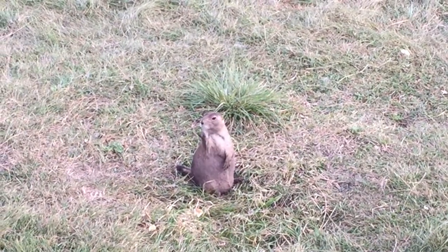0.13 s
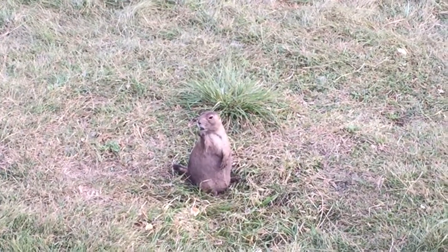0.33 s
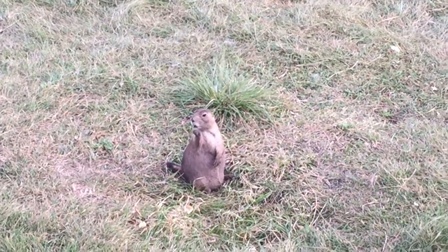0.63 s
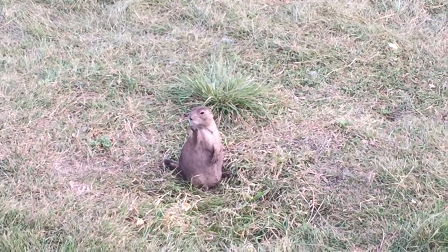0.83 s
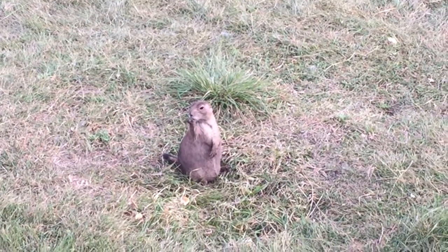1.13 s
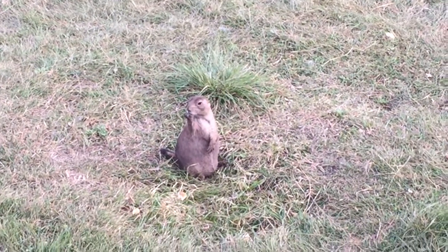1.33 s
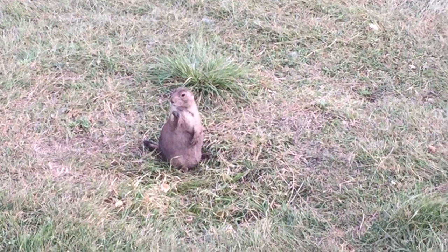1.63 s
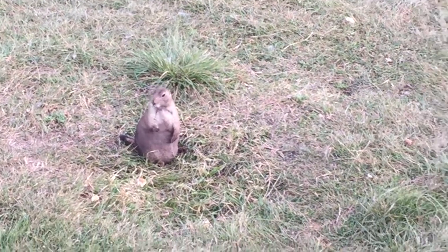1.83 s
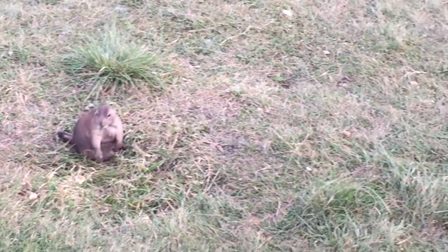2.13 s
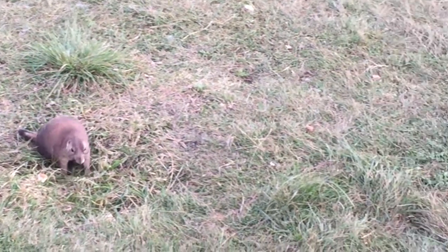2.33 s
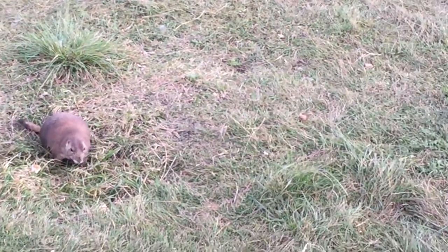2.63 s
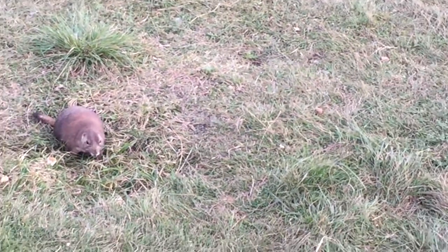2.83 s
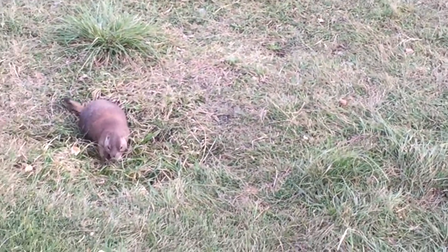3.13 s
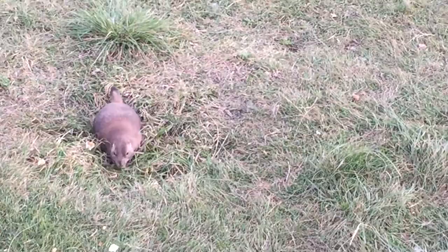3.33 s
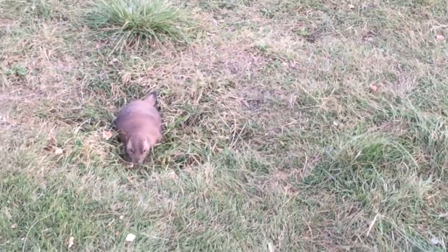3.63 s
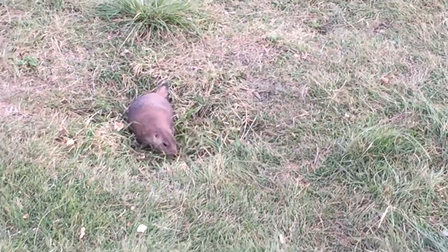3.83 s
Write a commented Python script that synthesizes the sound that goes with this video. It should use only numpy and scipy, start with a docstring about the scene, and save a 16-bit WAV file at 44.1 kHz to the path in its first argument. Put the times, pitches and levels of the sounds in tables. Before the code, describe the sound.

Small, high, yapping chirps of a prairie dog repeat once a second outdoors, with thin distant barks and peeps between. Low wind buffeting hits the unshielded microphone heavily at first, then eases, returning near the end; insects barely audible.

```python
"""Open grassland. A prairie dog gives a two-note chirping bark about once a second; a farther one barks thinly.
Both voices are stacks of harmonics whose pitch arches up and down; faint peeps are single arched tones.
Wind is shaped noise, and each thump is a smooth push of pressure on the microphone with a ragged burst round it.
Crickets are a noise band and other insects are pulsing tones; dry grass ticks with short noise bursts.
Still air, hiss, a thin whine and brief hums lie underneath."""
import sys
import numpy as np
from scipy import signal
from scipy.fft import rfft, irfft
from scipy.io import wavfile
from scipy.ndimage import uniform_filter1d

SR = 44100
rng = np.random.default_rng(int(sys.argv[2]) if len(sys.argv) > 2 else 0)


def digitize_waveform(pressure):
    """Quantize a signal to 16-bit integers and store it at the path in sys.argv[1].

    Rows of a 2-D input are taken as channels; values are limited to [-1, 1].
    """
    field = np.atleast_2d(pressure).T
    bounded = np.clip(field, -1, 1)
    quanta = np.round(bounded * 32767).astype(np.int16)
    wavfile.write(sys.argv[1], SR, quanta)


N = 176400  # length of the scene in samples

# Wind on the microphone, before the two trims: (time [s], rumble level [dB], flutter level [dB])
WIND = [(0, -28, -56), (.04, -23, -47.5), (.10, -30.5, -43.5), (.16, -25.5, -50), (.21, -33, -55),
        (.27, -22.5, -42.5), (.34, -32.5, -51), (.42, -35.5, -44.5), (.47, -38.5, -73), (.54, -23, -33.5),
        (.60, -30, -49), (.67, -24, -35.5), (.75, -36, -55), (.83, -30, -42.5), (1.02, -33, -51),
        (1.19, -33, -57.5), (1.27, -33.5, -64), (1.35, -43.5, -67.5), (1.47, -40, -72), (1.73, -44, -80),
        (1.81, -33.5, -53), (1.88, -34, -62), (1.93, -49, -81), (2.0, -37.5, -60), (2.07, -47.5, -81),
        (2.18, -43.5, -66.5), (2.33, -57.5, -70.5), (2.41, -36.5, -69), (2.53, -34, -69), (2.75, -37, -57),
        (2.80, -48, -72), (2.84, -40.5, -74), (2.91, -40, -57.5), (3.0, -31, -53.5), (3.05, -41.5, -68),
        (3.17, -36, -66), (3.31, -37.5, -64.5), (3.42, -48, -66), (3.46, -27.5, -57.5), (3.54, -32, -48),
        (3.57, -43.5, -73), (3.63, -31.5, -57), (3.76, -44.5, -68.5), (3.89, -20.5, -43.5),
        (3.94, -36.5, -60), (3.98, -29, -44.5), (4.0, -39.5, -52)]
# Tone colour of the deep rumble: (frequency [Hz], relative level [dB])
RUMBLE_SPECTRUM = [(20, -34.5), (32, -19), (50, 4), (105, 2.5), (180, -4.5), (260, -16), (400, -28.5),
                   (800, -77.5), (2500, -115)]
# Tone colour of the ragged flutter: (frequency [Hz], relative level [dB])
FLUTTER_SPECTRUM = [(100, -23.5), (200, -1.5), (300, 0.5), (420, -2.5), (620, -14), (800, -26.5),
                    (1200, -45.5), (2500, -66), (7000, -100)]
RUMBLE_TRIM_DB, FLUTTER_TRIM_DB = 2, 0.5
RUMBLE_PATCHY_DB, FLUTTER_PATCHY_DB = 5, 3.5  # spread of the uneven strength

# Tone colour of still air over the plain: (frequency [Hz], relative level [dB])
AIR_SPECTRUM = [(60, 19), (300, 6.5), (600, -9), (800, 3.5), (1050, 9), (1300, 1.5), (1700, 1), (2400, -1),
                (2900, -5.5), (3400, -3), (4800, -8.5), (6400, -8), (7600, -6.5), (8700, -6.5), (9900, -7),
                (10450, -11), (11200, -5.5), (15000, -7.5)]
AIR_DB = -67.5
# High hiss, before its trim: (time [s], level [dB])
HISS = [(0.0, -83), (1.21, -83), (1.54, -81.5), (1.71, -80.5), (2.96, -80.5), (3.63, -84), (4.0, -82.5)]
HISS_TRIM_DB, HISS_FROM_HZ = 1.5, 8600
TOP_HZ = 15250  # the recorder keeps nothing much above this
# Core of the thin far whine: (time [s], level [dB])
WHINE = [(0, -96), (.13, -75), (.45, -83.5), (.57, -75), (.95, -77.5), (1.25, -74), (1.55, -78),
         (1.73, -88), (1.95, -83), (2.25, -80), (2.6, -86.5), (4, -99)]
WHINE_HZ, WHINE_WIDTH_HZ = 2091, 44
WHINE_SKIRT_DB, WHINE_SKIRT_WIDTH_HZ = -2.5, 480  # wider band round the whine, relative to its core
# Faint far hums: (centre time [s], half length [s], pitch [Hz], peak level [dB])
HUMS = [(1.38, 0.15, 719, -71), (1.704, 0.074, 730, -77), (2.23, 0.25, 300, -64), (2.873, 0.049, 384, -59),
        (3.27, .05, 440, -60)]
HUM_WAVER = 0.012  # unsteadiness of pitch (share)

# Cricket chorus: (time [s], level [dB])
CRICKETS = [(0, -79), (.7, -80.5), (1.2, -75.5), (1.75, -75), (2.2, -81), (3.0, -77.5), (4, -79.5)]
CRICKET_HZ, CRICKET_WIDTH_HZ, CRICKET_PATCHY_DB = 4075, 390, 2
# Pulsing insects, level before it is doubled in gain:
# (start pitch [Hz], end pitch [Hz], width [Hz], pulse rate [1/s], level [dB], loudest time [s])
INSECTS = [(7560, 7260, 380, 15.5, -82, 1.8), (8280, 7950, 440, 16.5, -83.5, 2.5),
           (7950, 7450, 600, 15.9, -82, 1.7)]
INSECT_FADE_DB_PER_S, INSECT_PATCHY_DB = 5, 0.5

# Single eddies that thump the microphone: (time [s], peak level [dB], top of the thump [Hz])
THUMPS = [(.025, -15, 189), (0.056, -21.5, 220), (0.082, -20.5, 375), (.128, -20, 416),
          (.165, -19.5, 207.4), (0.23, -26.5, 428), (.252, -19.5, 169), (.286, -21.5, 518),
          (0.293, -13, 306), (.329, -28.5, 597), (.369, -23, 302), (0.402, -29, 435), (0.422, -23, 450),
          (0.491, -27, 504), (0.529, -17.5, 250), (0.558, -17.5, 380), (.652, -24, 498), (.678, -26, 530),
          (.783, -24, 420), (0.807, -20.5, 430), (.871, -22, 447), (0.901, -26.5, 470), (1.036, -23.5, 260),
          (1.258, -21.5, 203), (1.453, -31, 245), (1.52, -32, 426), (1.624, -33.5, 248), (1.767, -27, 208),
          (1.816, -25.5, 287), (1.966, -33, 328), (2.389, -28.5, 262), (2.442, -27, 202), (2.527, -27, 260),
          (2.598, -34, 290), (2.628, -25.5, 230), (2.714, -40, 296), (2.734, -23, 294), (2.938, -19.5, 276),
          (2.977, -33, 287), (2.998, -20, 110.3), (3.085, -26, 259), (3.193, -21, 236), (3.268, -27.5, 260),
          (3.365, -16.5, 268.5), (3.446, -17, 417), (3.457, -20, 190), (3.542, -25, 243),
          (3.843, -29.5, 416), (3.874, -24, 396), (3.890, -16, 190), (3.899, -20, 358)]
PORT_HZ, THUMP_SHAPE = 88, 1.355  # the microphone sheds pressure below this; how late a thump peaks
RING_HZ, RING_Q, RING_DB = 158, 2.2, -3.5  # the microphone port rings briefly after each push
# Ragged burst round a 400 Hz thump: level relative to the thump's peak, half length, delay
WAKE_DB, WAKE_S, WAKE_LATE_S = -18, 0.007, 0.0025

# Barks of the far animal:
# (time [s], length [s], top pitch [Hz], second harmonic level [dB], third harmonic level [dB])
FAR_BARKS = [(0.359, 0.048, 1910, -91, -68.5), (1.419, 0.06, 1905, -57.5, -62.5),
             (2, 0.061, 1870, -56, -56.5), (3.511, 0.053, 1850, -58, -64.5)]
FAR_SAG, FAR_DROP = 0.085, 0.05  # pitch lost at both ends; further fall as a note runs out (shares)
FAR_SWELL, FAR_SKEW = 1.46, 0.8  # steepness of the swell; below 1 the top comes early
FAR_FIRST_DB, FAR_FOURTH_DB = -15, -23.5  # relative to the second and to the third harmonic
FAR_RASP_DB, NEAR_RASP_DB, RASP_HZ = -17, -28, 600  # roughness of each voice; its spread round a harmonic
BARK_JITTER = 0.0079  # unsteadiness of pitch (share)

# Ticks in the dry grass: (time [s], centre [Hz], width [Hz], decay [s], level at the onset [dB])
TICKS = [(0.744, 9600, 1700, 0.0046, -67), (.937, 13000, 4000, .008, -71), (1.804, 3870, 2020, 0.0033, -59)]

# Notes of the near animal, two to a bark, before the throat and the flattened top:
# (time [s], length [s], top pitch [Hz], level [dB])
NEAR_NOTES = [(1.027, 0.014, 2084, -51), (1.044, .048, 1904, -49), (2.056, 0.034, 2045, -45),
              (2.071, 0.043, 1915, -43), (3.032, 0.018, 2058, -48), (3.049, 0.049, 1898, -47)]
# Throat of the near animal: (frequency [Hz], gain [dB])
NEAR_THROAT = [(1650, -5.5), (1900, 1), (2100, 3.5), (3200, 8), (3500, -28), (3800, -16), (4100, -17.5),
               (5200, -21), (5700, -11), (6100, -19), (7600, -29.5), (9500, -36)]
NEAR_SAG, NEAR_SWELL, NEAR_FLAT = 0.17, 1.3, 1.22  # pitch lost at the ends (share); swell; flatness of top

# Faint peeps from far across the plain: (time [s], length [s], top pitch [Hz], peak level [dB])
PEEPS = [(1.146, 0.033, 2082, -60), (1.701, 0.076, 2150, -64.5), (1.938, .04, 2500, -74),
         (2.32, 0.045, 2470, -74), (3.097, .04, 1045, -68), (3.168, .04, 1400, -69),
         (3.34, 0.041, 1460, -72), (3.68, 0.057, 1087, -72)]
PEEP_SAG = 0.04  # pitch lost at the ends (share)
FIELD_DB, FIELD_T60_S = -19, 0.39  # level of the scattered tail; time it takes to fall 60 dB


def undb(db):
    """Turn decibels into gain."""
    return 10 ** (np.asarray(db) / 20)


def times():
    """Give the time of each sample in seconds."""
    return np.arange(N) / SR


def curve(rows, column=1):
    """Join the levels of a table with straight lines in dB, and give the gain at each sample."""
    rows = np.array(rows)
    return undb(np.interp(times(), rows[:, 0], rows[:, column]))


def gain_at(hz, points):
    """Read the gain of a spectrum at the given frequencies, evenly by musical distance."""
    points = np.array(points)
    return undb(np.interp(np.log(np.maximum(hz, 1)), np.log(points[:, 0]), points[:, 1]))


def noise(shape):
    """Make noise of rms 1 whose spectrum is shape(Hz)."""
    hz = np.arange(N // 2 + 1) * SR / N
    x = irfft(rfft(rng.standard_normal(N)) * shape(hz), N)
    return x / x.std()


def band(hz, width_hz):
    """Make noise gathered round one frequency."""
    return noise(lambda f: 1 / (1 + np.abs(2 * (f - hz) / width_hz) ** np.pi))


def walk(rate_hz):
    """Wander smoothly at random round 0 with a spread of 1."""
    return noise(lambda f: np.exp(-(f / rate_hz) ** 2))


def arch(start, length, skew=1):
    """Rise from 0 at the start of a note to 1 at its top, and back to 0 at its end."""
    progress = np.clip((times() - start) / length, 0, 1)
    return 1 - (2 * progress ** skew - 1) ** 2


def cycles(hz):
    """Add up pitch into the phase of a slightly unsteady voice."""
    return 2 * np.pi * np.cumsum(hz * (1 + BARK_JITTER * walk(350))) / SR


def rasp(db):
    """Make the breathy unevenness of a harmonic's strength."""
    return 1 + undb(db) * walk(RASP_HZ)


def turbulence(spectrum, patchy_db, rate_hz):
    """Fast uneven swirls whose strength over a longer stretch holds steady."""
    swirls = noise(lambda f: gain_at(f, spectrum)) * undb(patchy_db * walk(rate_hz))
    # two running averages, each 1800 samples (about 41 ms)
    power = uniform_filter1d(uniform_filter1d(swirls ** 2, size=1800), size=1800)
    return swirls / np.sqrt(power)


def wind():
    """Gusts drive a deep rumble and a ragged flutter."""
    rumble = turbulence(RUMBLE_SPECTRUM, RUMBLE_PATCHY_DB, 24) * curve(WIND)
    flutter = turbulence(FLUTTER_SPECTRUM, FLUTTER_PATCHY_DB, 97) * curve(WIND, column=2)
    return rumble * undb(RUMBLE_TRIM_DB) + flutter * undb(FLUTTER_TRIM_DB)


def distance():
    """Still air with a slowly swelling hiss, a thin whine and a few brief hums."""
    air = undb(AIR_DB) * noise(lambda f: gain_at(f, AIR_SPECTRUM) * (f < HISS_FROM_HZ))
    high = noise(lambda f: gain_at(f, AIR_SPECTRUM) * (f >= HISS_FROM_HZ) * (f < TOP_HZ))
    hiss = undb(HISS_TRIM_DB) * curve(HISS) * high
    skirt = undb(WHINE_SKIRT_DB) * band(WHINE_HZ, WHINE_SKIRT_WIDTH_HZ)
    whine = (band(WHINE_HZ, WHINE_WIDTH_HZ) + skirt) * curve(WHINE)
    hums = np.zeros(N)
    for centre, half_length, hz, db in HUMS:
        tone = np.sin(cycles(hz * (1 + HUM_WAVER * walk(13.5))))
        hums += undb(db) * tone * np.exp(-((times() - centre) / half_length) ** 2)
    return air + hiss + hums + whine


def insects():
    """A cricket chorus and three insects that pulse at their own rates, sinking slowly in pitch."""
    out = band(CRICKET_HZ, CRICKET_WIDTH_HZ) * undb(CRICKET_PATCHY_DB * walk(50)) * curve(CRICKETS)
    for first_hz, last_hz, width_hz, rate, db, loudest in INSECTS:
        stroke = np.sin(np.pi * np.cumsum(rate * (1 + 0.0091 * walk(3))) / SR) ** 2
        tone = np.sin(2 * np.pi * np.cumsum(np.linspace(first_hz, last_hz, N)) / SR)
        buzz = walk(width_hz / 2) * tone  # random strength widens the tone into a band
        level_db = db - INSECT_FADE_DB_PER_S * np.abs(times() - loudest) + INSECT_PATCHY_DB * walk(9.4)
        out = out + 2 * undb(level_db) * stroke * buzz
    return out


def thumps():
    """Each eddy is one smooth push of pressure that the microphone turns into a short swing."""
    out = np.zeros(N)
    lead = 0.01  # seconds of run-up before each thump's time
    t = np.arange(4000) / SR - lead
    port = signal.butter(4, PORT_HZ, "high", fs=SR, output="sos")
    for s, db, hz in THUMPS:
        push = np.exp(-(np.pi * hz * t - THUMP_SHAPE) ** 2)
        ring = signal.lfilter(*signal.iirpeak(RING_HZ, RING_Q, fs=SR), push)
        swing = signal.sosfilt(port, push + undb(RING_DB) * ring)
        start = int((s - lead) * SR)
        part = out[start:start + len(swing)]
        part += undb(db) * swing[:len(part)] / np.abs(swing).max()
    return out


def wakes():
    """Every eddy breaks into a short burst of flutter, stronger for the sharp ones."""
    bursts = np.zeros(N)
    for s, db, hz in THUMPS:
        swell = np.exp(-((times() - s - WAKE_LATE_S) / WAKE_S) ** 2)
        bursts += undb(db) * (hz / 400) ** 2 * swell
    return undb(WAKE_DB) * bursts * noise(lambda f: gain_at(f, FLUTTER_SPECTRUM))


def far_dog():
    """Single raspy notes that arch and drop away, with a weak fundamental."""
    out = np.zeros(N)
    for s, length, top_hz, second_db, third_db in FAR_BARKS:
        effort = arch(s, length, FAR_SKEW)
        progress = np.clip((times() - s) / length, 0, 1)
        phase = cycles(top_hz * (1 - FAR_SAG * (1 - effort) - FAR_DROP * progress ** 3))
        levels_db = [second_db + FAR_FIRST_DB, second_db, third_db, third_db + FAR_FOURTH_DB]
        voice = sum(undb(db) * np.sin(k * phase) for k, db in enumerate(levels_db, start=1))
        out += effort ** FAR_SWELL * rasp(FAR_RASP_DB) * voice
    return out


def grass():
    """Dry stalks snap faintly: noise that starts at once and dies away."""
    t = times()
    out = np.zeros(N)
    for s, hz, width_hz, decay, db in TICKS:
        out += undb(db) * band(hz, width_hz) * (t > s) * np.exp(-np.abs(t - s) / decay)
    return out


def near_dog():
    """One voice arches through two notes per bark; its harmonics slide through the throat."""
    hz, effort = np.zeros(N), np.zeros(N)
    for s, length, top_hz, db in NEAR_NOTES:
        shape = arch(s, length)
        # where notes overlap, the higher pitch and the stronger effort win
        hz = np.maximum(hz, top_hz * (1 - NEAR_SAG * (1 - shape)) * (shape > 0))
        effort = np.maximum(effort, undb(db) * np.tanh(NEAR_FLAT * shape ** NEAR_SWELL))
    phase = cycles(hz)
    voice = np.zeros(N)
    for k in range(1, 6):
        voice += gain_at(k * hz, NEAR_THROAT) * rasp(NEAR_RASP_DB) * np.sin(k * phase)
    return effort * voice


def peeps():
    """Distant calls reduced to one soft arched tone."""
    out = np.zeros(N)
    for s, length, hz, db in PEEPS:
        shape = arch(s, length)
        out += undb(db) * shape * np.sin(cycles(hz * (1 - PEEP_SAG * (1 - shape))))
    return out


def field(calls):
    """Grass and ground scatter a weak short tail behind the calls."""
    tail = rng.standard_normal(N) * np.exp(-np.log(1000) * times() / FIELD_T60_S)
    return calls + undb(FIELD_DB) * signal.fftconvolve(calls, tail / np.linalg.norm(tail))[:N]


def scene():
    """Add everything up at the one microphone."""
    calls = field(far_dog() + near_dog() + peeps())
    mix = wind() + distance() + insects() + thumps() + wakes() + grass() + calls
    return mix[None]


def record(dry):
    """The recorder cuts the top with a steep low-pass."""
    return signal.sosfilt(signal.ellip(10, 0.2, 70, TOP_HZ, fs=SR, output="sos"), dry)


dry = scene()
out = record(dry)
digitize_waveform(out)
```